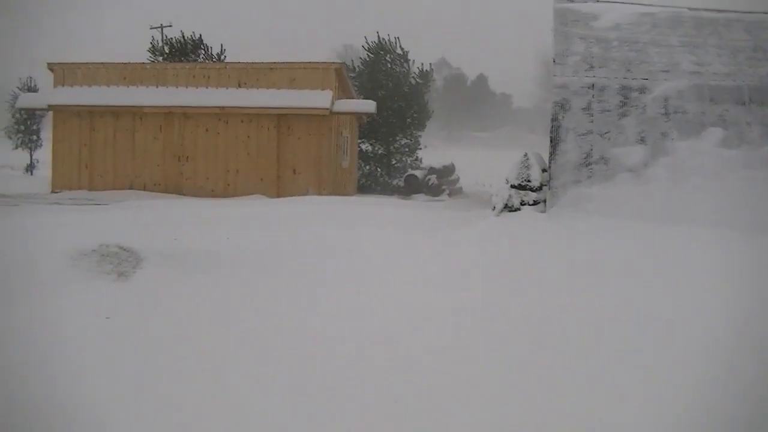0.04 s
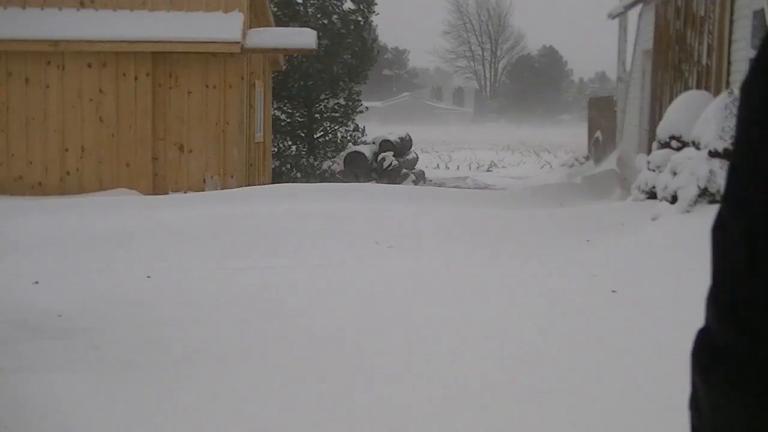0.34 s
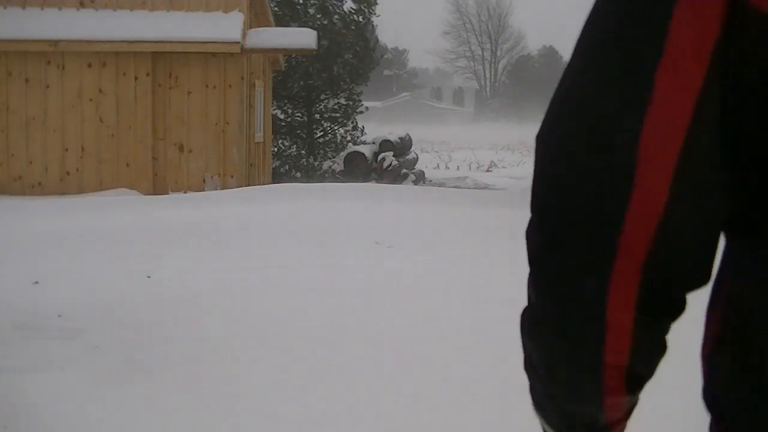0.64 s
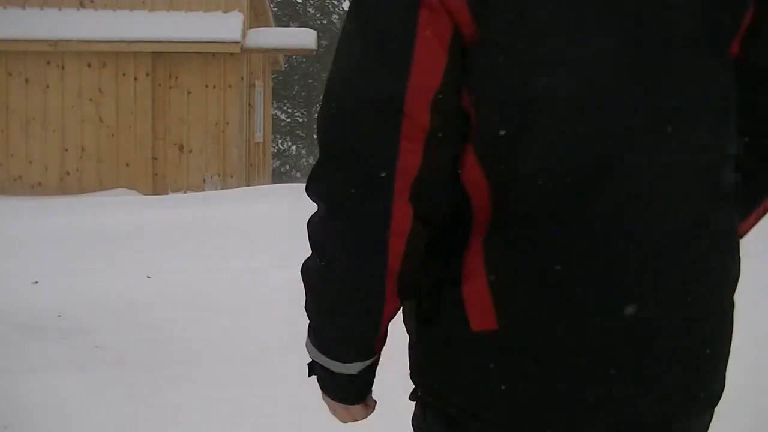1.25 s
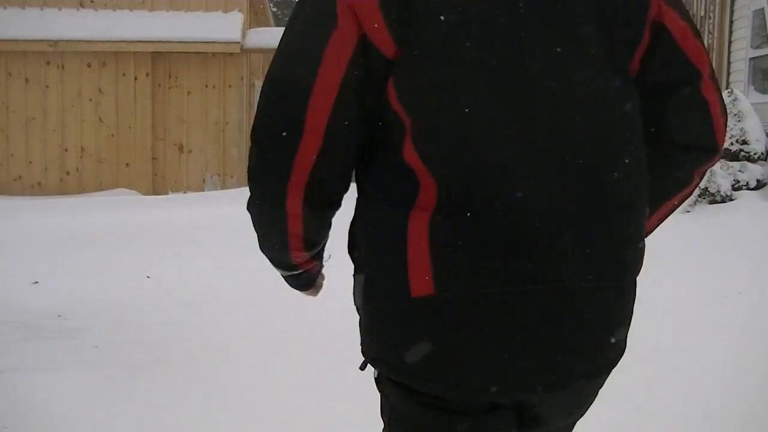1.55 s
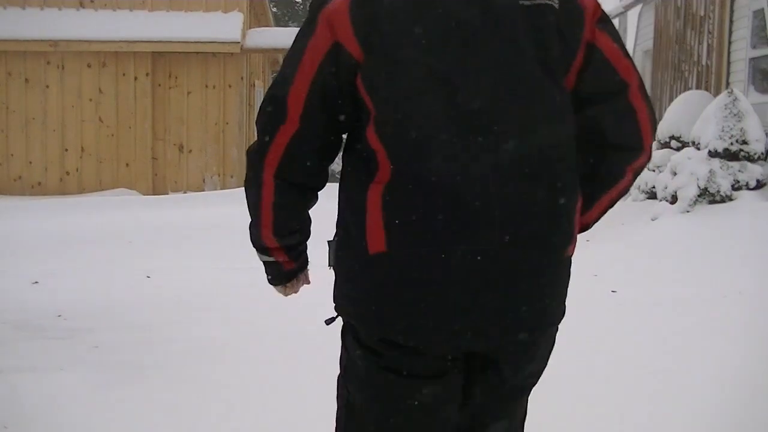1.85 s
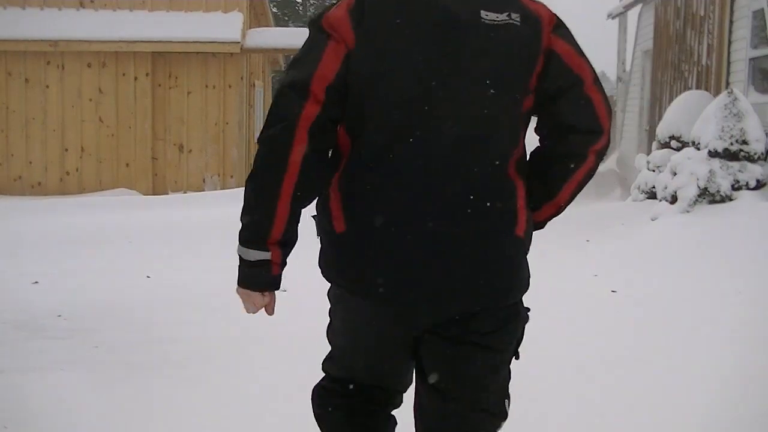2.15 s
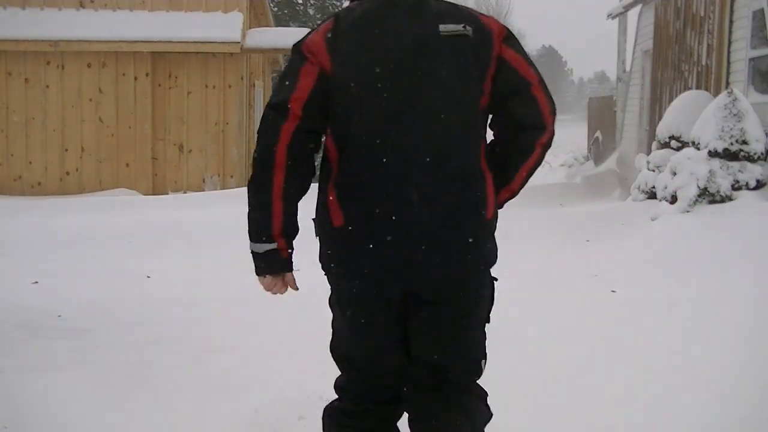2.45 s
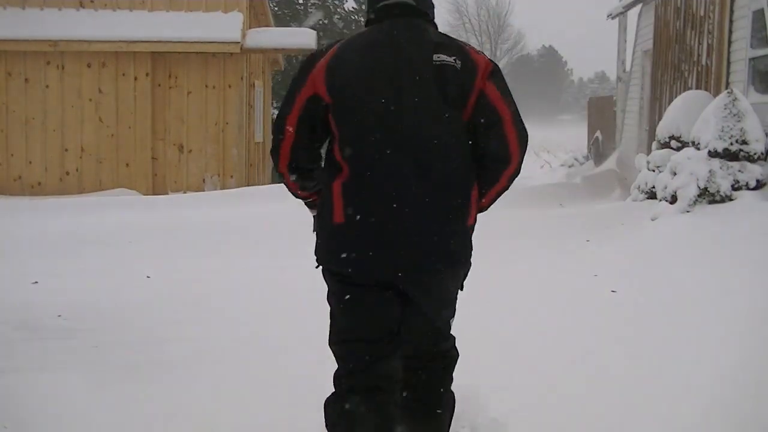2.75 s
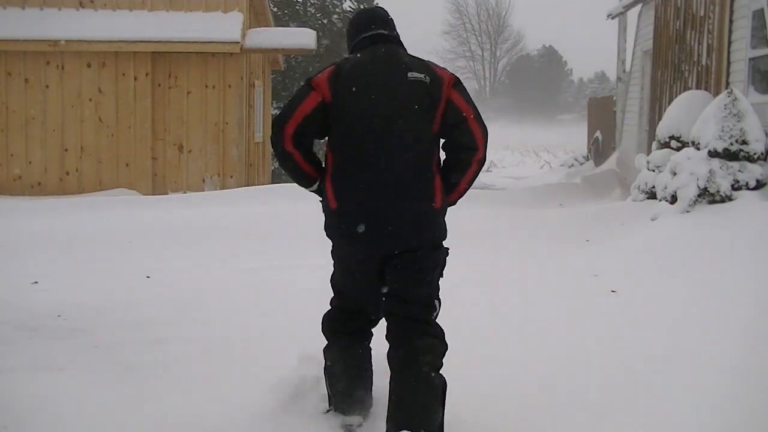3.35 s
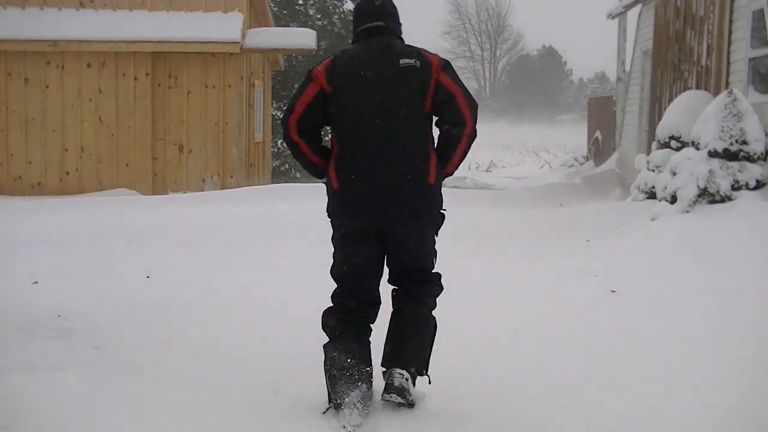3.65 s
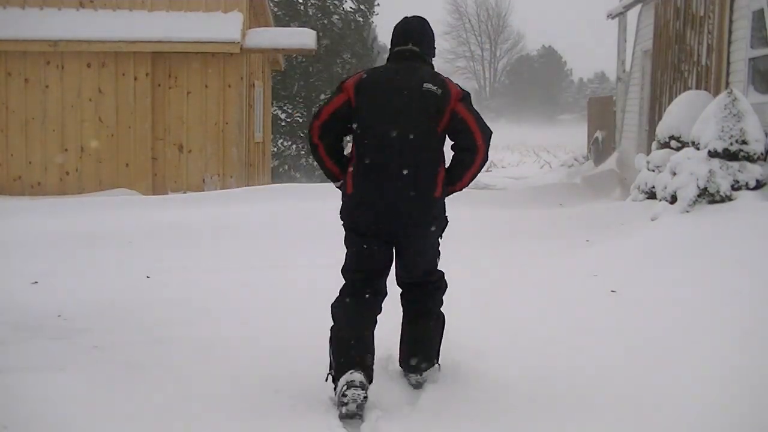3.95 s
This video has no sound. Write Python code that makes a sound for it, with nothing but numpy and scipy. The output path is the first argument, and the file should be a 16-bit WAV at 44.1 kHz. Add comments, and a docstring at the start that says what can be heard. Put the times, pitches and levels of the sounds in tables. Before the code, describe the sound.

Someone walks through snow in a rustling snowsuit while gusts rumble on the microphone.

```python
"""A snowsuit walk in the wind

Someone in a nylon snowsuit walks away through dry snow. At each stride cloth and powder hiss,
the ribbed weave of the legs zips, and snow crunches under the boots. Gusts buffet the microphone
and push its gain down, blown snow ticks on it, and wind rushes in far trees."""
import sys
import numpy as np
from scipy import signal
from scipy.fft import rfft, irfft
from scipy.io import wavfile

SR = 44100
rng = np.random.default_rng(int(sys.argv[2]) if len(sys.argv) > 2 else 0)


def dump_mix(stems):
    """Bounce the given channels to the path in sys.argv[1] as a 16-bit WAV at rate SR."""
    frames = np.atleast_2d(stems).T  # one column per channel
    limited = np.clip(frames, -1, 1)  # hard clip at full scale
    pcm = np.round(limited * 32767).astype(np.int16)
    wavfile.write(sys.argv[1], SR, pcm)


N = 176400  # 4 seconds


def undb(db):
    """Turn decibels into a factor to multiply a sound by."""
    return 10 ** (np.asarray(db) / 20)


def unit(x):
    """Scale x so that its average size (rms) is 1."""
    return x / np.sqrt(np.mean(np.abs(x) ** 2))


def colour(x, tone):
    """Shape the lows and highs of x with a curve of (Hz, dB) points, at rms 1."""
    hz, db = np.array(tone).T
    freqs = np.maximum(np.arange(N // 2 + 1) * SR / N, 1)
    curve_db = np.interp(np.log(freqs), np.log(hz), db)
    return unit(irfft(rfft(x) * undb(curve_db), N))


def noise(tone):
    """Noise shaped by a tone curve, at rms 1."""
    return colour(rng.standard_normal(N), tone)


def wander(hz):
    """A random wobble, mostly slower than hz, at rms 1."""
    freqs = np.arange(N // 2 + 1) * SR / N
    keep_slow = (freqs > 0) / (1 + (freqs / hz) ** 2) ** 2
    return unit(irfft(rfft(rng.standard_normal(N)) * keep_slow, N))


def judder(depth_db, hz):
    """A gain that shakes at random, up or down by at most depth_db."""
    return undb(depth_db * np.tanh(wander(hz)))


def grains(per_s, spread_db):
    """Random clicks, most small and a few large."""
    size = undb(spread_db * np.minimum(rng.exponential(size=N), 4))
    return (rng.random(N) < per_s / SR) * size * rng.choice([-1, 1], N)


def swell(t, peak_s, rise_s, fall_s):
    """A rounded peak that rises and falls with soft tails."""
    width_s = np.where(t < peak_s, rise_s, fall_s)
    return np.exp(-np.abs((t - peak_s) / width_s) ** 1.7)


# The tone of the wind in the trees. Each row: frequency in Hz, relative level in dB.
TREE_TONE = [(30, -34), (170, -18), (300, -4.5), (520, 1), (800, 0), (1300, -7.5), (4000, -16),
             (9500, -23.5), (15500, -34.5)]


def far_trees():
    """Wind rushes steadily through far trees, with a slight flutter."""
    level_db = -38.5 + 0.8 * wander(26)
    return undb(level_db) * noise(TREE_TONE)


# The strength of the wind on the microphone. Each row: time in seconds, level in dB.
GUST_LEVELS = [(0, -59), (.5, -46), (.7, -68), (.87, -35.5), (.96, -37), (1.0, -30.5), (1.08, -46.5),
               (1.23, -44.5), (1.28, -34), (1.46, -39), (1.52, -22), (1.57, -41), (1.67, -37.5),
               (1.76, -29), (1.89, -28.5), (2.02, -46.5), (2.11, -23), (2.15, -40), (2.225, -20.5),
               (2.27, -20.5), (2.33, -18.5), (2.385, -19.5), (2.42, -30), (2.455, -23), (2.48, -36.5),
               (2.6, -33), (2.645, -24), (2.72, -27.5), (2.76, -29), (2.82, -24), (2.87, -36),
               (2.94, -27.5), (2.98, -48.5), (3.26, -40), (3.34, -49.5), (3.43, -42), (3.5, -53), (4, -44)]
# The tones of the wind's low rumble and higher sputter. Each row: frequency in Hz, relative level in dB.
RUMBLE_TONE = [(40, -22), (80, -10.5), (130, 0), (220, 4), (400, -1), (600, -16.5), (1000, -32),
               (2000, -48)]
SPUTTER_TONE = [(80, -31), (200, -3), (400, 2.5), (900, -4), (1600, -16), (3500, -41)]
# Single hard swirls of air. Each row: peak time in seconds, pitch in Hz, rise and fall time in seconds,
# level in dB.
EDDY_SLAPS = [(0.615, 440, 0.0037, -25.5), (0.627, 430, 0.002, -23.5), (0.993, 264, 0.01, -22.5),
              (1.404, 520, 0.007, -21), (1.512, 340, 0.0042, -19.5), (1.532, 292, 0.004, -23),
              (1.772, 480, .004, -23), (1.887, 462, 0.002, -20), (2.198, 267, 0.0032, -15.5),
              (2.234, 435, 0.0032, -4), (2.291, 960, 0.0013, -10), (2.328, 700, .002, -11),
              (2.721, 400, .003, -17), (2.947, 298, 0.0018, -22)]


def buffeting(t):
    """Swirling air hits the microphone: an uneven rumble, a sputter in strong gusts, and ragged slaps."""
    gust_db = np.interp(t, *np.array(GUST_LEVELS).T)
    rumble = colour(rng.standard_normal(N) * judder(depth_db=6, hz=115), RUMBLE_TONE)
    sputter = colour(rng.standard_normal(N) * judder(depth_db=7.5, hz=350), SPUTTER_TONE)
    # As the wind eases, the sputter fades faster than the rumble.
    lull_db = gust_db.max() - gust_db
    sputter_db = gust_db.max() - 3.5 - 2.24 * lull_db
    out = undb(gust_db - 0.5) * rumble + undb(sputter_db) * sputter
    for peak_s, hz, width_s, db in EDDY_SLAPS:
        slap = np.sin(2 * np.pi * hz * (t - peak_s)) + 0.38 * sputter
        out += undb(db) * swell(t, peak_s, width_s, width_s) * slap
    return out


# Snow grains hitting the microphone. Each row: start in seconds, pitch in Hz, level in dB.
SNOW_TICKS = [(0.2022, 1200, -20), (0.3152, 1630, -20.5), (0.325, 1700, -13), (.4335, 750, -20.5),
              (0.6594, 1250, -13.5), (0.8366, 1490, -17), (2.0433, 970, -25), (3.605, 1800, -27.5)]
# The tone of each tick's snap. Each row: frequency in Hz, relative level in dB.
SNAP_TONE = [(800, 5), (6000, -5), (12000, -31)]


def blown_snow(t):
    """Blown grains tick on the microphone: its housing flexes briefly, with a sharp snap."""
    flex_fade_cycles, snap_fade_s = 0.43, 0.0004
    out = np.zeros(N)
    grit = noise(SNAP_TONE)
    for start, hz, db in SNOW_TICKS:
        on = (t >= start) & (t < start + 0.01)
        age = t[on] - start
        cycles = age * hz
        flex = cycles * np.exp(-cycles / flex_fade_cycles) * np.sin(2 * np.pi * cycles)
        flex_speed = np.gradient(flex) * SR / hz
        snap = undb(-5) * np.exp(-age / snap_fade_s) * grit[on]
        out[on] += undb(db) * (flex_speed + snap)
    return out


# Boots pressing the snow. Each row: peak time in seconds, level in dB.
FOOTSTEPS = [(.33, -51.5), (1.40, -49.5), (2.05, -46.5), (2.66, -55), (3.17, -55), (3.68, -53)]
# The tone of breaking snow. Each row: frequency in Hz, relative level in dB.
CRUNCH_TONE = [(100, 0), (400, 0), (1800, 24), (4000, 3), (12000, -25)]


def boot_crunch(t):
    """Snow crystals break under each boot in a dense run of tiny clicks."""
    weight = sum(undb(db) * swell(t, peak_s, rise_s=0.2, fall_s=0.17) for peak_s, db in FOOTSTEPS)
    return weight * colour(grains(per_s=600, spread_db=4), CRUNCH_TONE)


# One leg's weave sliding over the other's. Each row: start in seconds, length in seconds,
# first pitch in Hz, last pitch in Hz, level in dB, spread of pitch in Hz.
LEG_ZIPS = [(0.149, .02, 5210, 6500, -28, 300), (0.166, 0.035, 5200, 5300, -25.5, 600),
            (0.195, 0.022, 5800, 6900, -32, 250), (0.742, 0.014, 2810, 2820, -29, 100),
            (0.759, 0.014, 4890, 4900, -26, 120), (0.77, 0.042, 5120, 6900, -26, 550),
            (0.788, 0.035, 8660, 9150, -31, 450), (0.802, 0.026, 4900, 4250, -27.5, 350),
            (1.25, .095, 2200, 2900, -39, 700), (1.996, 0.028, 4150, 4300, -23, 650),
            (2.026, 0.034, 4100, 3750, -28, 350), (2.0, .048, 5200, 5600, -29, 400),
            (2.488, 0.024, 2510, 2670, -38, 130), (2.504, 0.02, 4200, 5500, -29, 500),
            (2.525, .047, 6000, 7400, -26, 1200), (2.567, 0.007, 7900, 8050, -18, 100),
            (3.046, 0.034, 6500, 6600, -27, 400), (3.078, 0.036, 5100, 5000, -34, 400),
            (3.135, .016, 10800, 11200, -29, 160), (3.57, 0.026, 5100, 6300, -36, 130),
            (3.618, 0.014, 7300, 7400, -37, 650)]


def weave_zips(t):
    """Ribs catch faster as the leg speeds up: a squeak if the threads keep in step, a rasp if not."""
    attack_s, octave_db = 0.004, -16
    out = np.zeros(N)
    for start, length, first_hz, last_hz, db, spread_hz in LEG_ZIPS:
        on = (t >= start) & (t < start + length)
        age = t[on] - start
        progress = age / length
        pitch_hz = first_hz + (last_hz - first_hz) * progress
        ribs = np.exp(2j * np.pi * np.cumsum(pitch_hz) / SR)
        squeak = ribs + undb(octave_db) * ribs ** 2  # squaring doubles the pitch
        # Threads drifting out of step smear the pitch.
        threads = unit((wander(2 * spread_hz) + 1j * wander(2 * spread_hz))[on])
        pressure = np.minimum(age / attack_s, 1) * np.sqrt(np.abs(1 - progress ** 2))
        out[on] += undb(db) * pressure * (threads * squeak).real
    return out * unit(judder(depth_db=3.5, hz=260))


# Swings of a leg or arm. Each row: peak time in seconds, rise in seconds, fall in seconds, level in dB,
# extra level for the bright powder hiss in dB.
LIMB_SWINGS = [(0.01, 0.068, 0.027, -25.5, 2), (0.171, 0.07, 0.063, -28, -2.5),
               (0.349, 0.15, 0.094, -31, -0.5), (0.558, 0.067, 0.073, -32.5, -5.5),
               (.79, 0.11, 0.065, -28.5, -4), (.95, 0.16, 0.18, -33.5, 1.5), (1.32, 0.14, 0.17, -31.5, 1),
               (1.68, 0.035, 0.037, -52, 7.5), (2.013, 0.062, 0.081, -28.5, -0.5),
               (2.17, 0.21, 0.12, -34, -0.5), (2.55, 0.086, 0.11, -34.5, 1),
               (2.617, 0.0091, 0.013, -28, -9), (3.07, 0.094, 0.07, -35.5, -0.5),
               (3.143, 0.0051, 0.0085, -38, 7), (3.58, 0.046, 0.029, -38.5, 3)]
# The tones of rubbing nylon and sliding powder. Each row: frequency in Hz, relative level in dB.
CLOTH_TONE = [(80, -11), (400, 10.5), (4600, 7), (7500, 5), (10000, -14)]
POWDER_TONE = [(2000, -13), (5500, -8), (8500, 2), (10800, 1.5), (13000, -4), (15500, -10.5)]


def suit_swishes(t):
    """Rubbing cloth and sliding powder snow hiss with each swing of a leg or arm."""
    cloth_power, powder_power = 0, 0
    for peak_s, rise_s, fall_s, db, bright_db in LIMB_SWINGS:
        power = (undb(db) * swell(t, peak_s, rise_s, fall_s)) ** 2
        cloth_power += power
        powder_power += power * undb(bright_db) ** 2
    cloth = undb(-5.5) * np.sqrt(cloth_power) * noise(CLOTH_TONE)
    powder = undb(-7) * np.sqrt(powder_power) * noise(POWDER_TONE)
    roughness = undb(1.5 * wander(150))
    return (cloth + powder) * roughness


def scene():
    """Add the walker and the wind together in one channel."""
    t = np.arange(N) / SR
    walker = suit_swishes(t) + weave_zips(t) + boot_crunch(t)
    wind = blown_snow(t) + buffeting(t) + far_trees()
    return (walker + wind)[None]


def record(dry):
    """The microphone's gain drops when the sound is loud, then recovers; deep bass and top are cut."""
    threshold_db, smoothing_s = -30, 0.072
    duck_slope = 0.73  # dB of gain lost for each extra dB, well above the threshold
    low_cut_hz, high_cut_hz = 76.6, 15800
    memory = np.exp(-1 / (smoothing_s * SR))
    power = signal.lfilter([1 - memory], [1, -memory], dry ** 2)
    overload = power / undb(threshold_db) ** 2
    gain = (1 + overload ** 2) ** (-duck_slope / 4)
    bass_cut = signal.butter(2, low_cut_hz, "high", fs=SR, output="sos")
    top_cut = signal.ellip(10, 0.2, 70, high_cut_hz, fs=SR, output="sos")
    return signal.sosfilt(top_cut, signal.sosfilt(bass_cut, dry * gain))


dry = scene()
out = record(dry)
dump_mix(out)
```